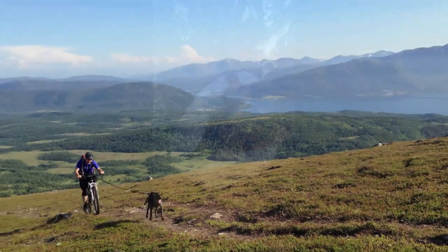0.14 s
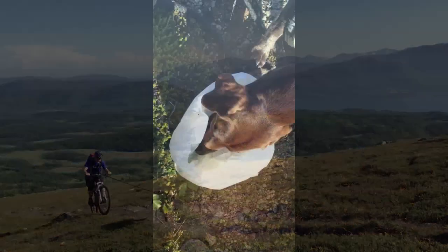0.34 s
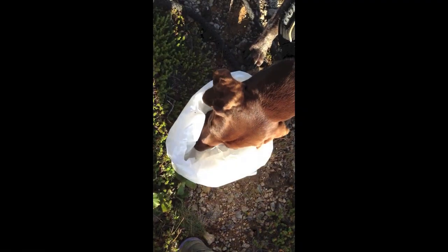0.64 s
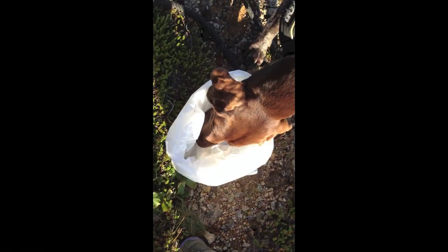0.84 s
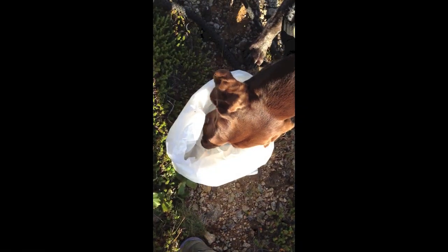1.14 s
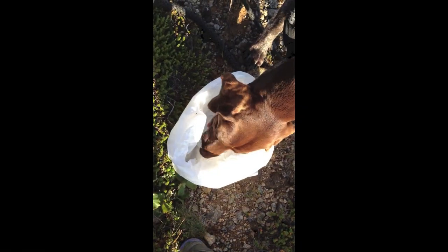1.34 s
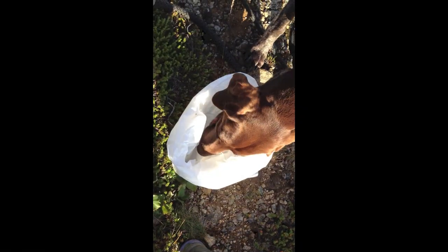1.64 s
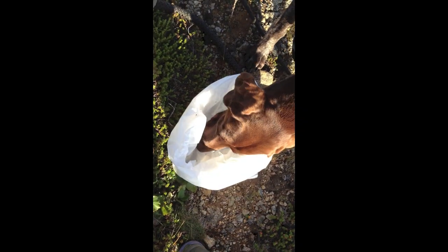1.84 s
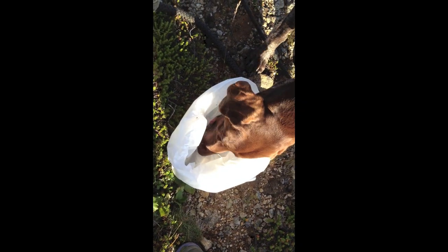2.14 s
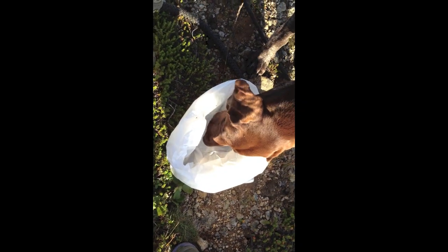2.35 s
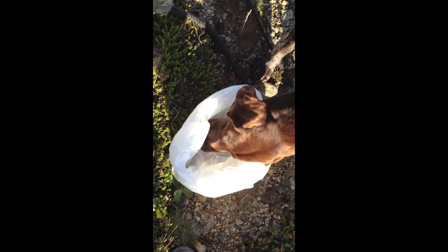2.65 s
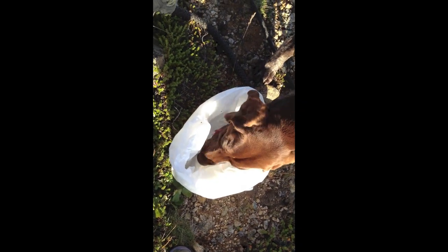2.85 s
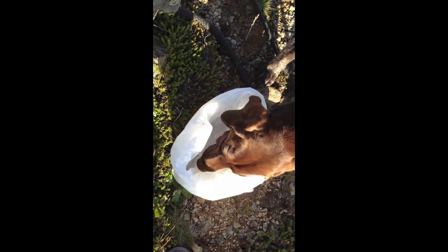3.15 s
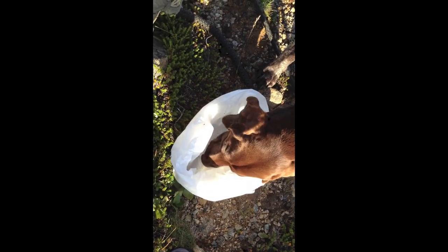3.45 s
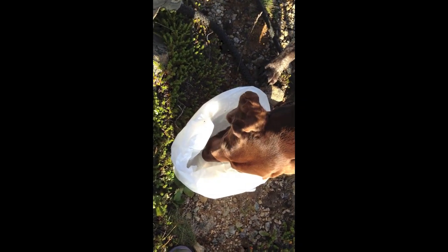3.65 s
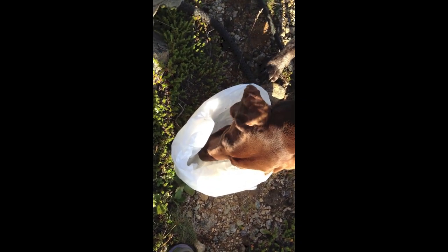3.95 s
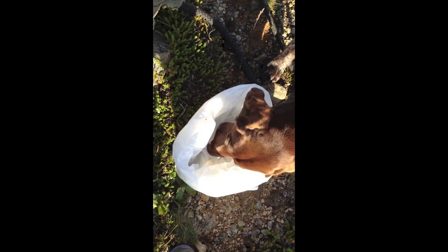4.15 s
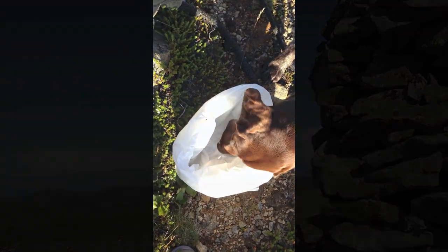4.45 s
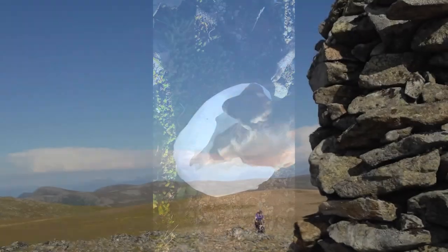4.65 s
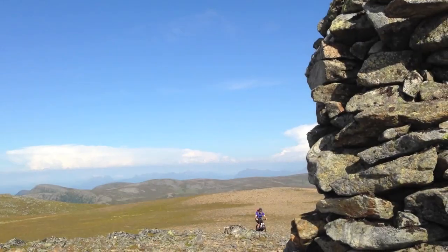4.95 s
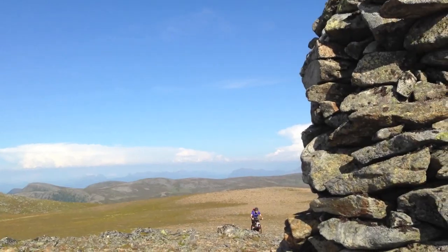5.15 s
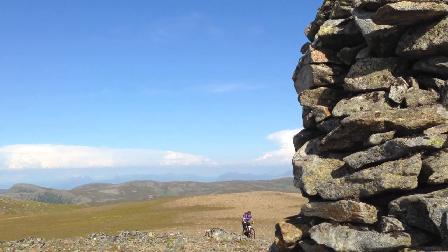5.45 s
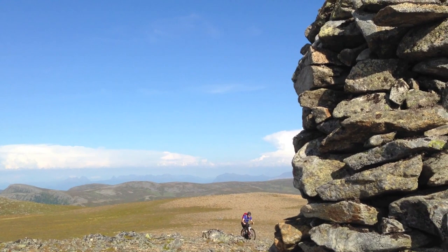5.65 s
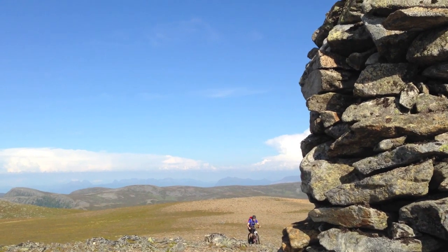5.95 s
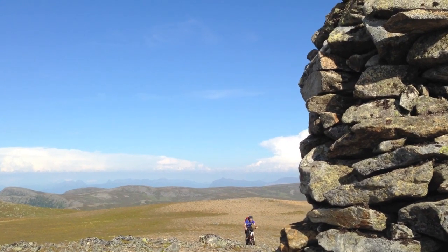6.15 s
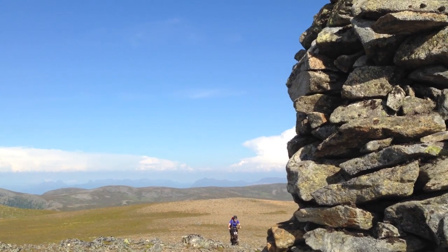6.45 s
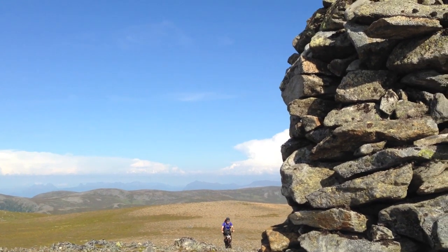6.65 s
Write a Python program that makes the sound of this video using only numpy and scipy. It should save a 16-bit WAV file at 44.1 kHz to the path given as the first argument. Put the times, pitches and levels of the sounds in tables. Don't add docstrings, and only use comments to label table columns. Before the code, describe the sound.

A dog laps water from a soft bag close up, quick wet slaps and hollow gulps about three a second, then faint hiss and a few taps.

```python
import sys
import numpy as np
from scipy import signal
from scipy.fft import rfft, irfft
from scipy.io import wavfile

SR = 44100
rng = np.random.default_rng(int(sys.argv[2]) if len(sys.argv) > 2 else 0)


def ratio(d):
    e = np.asarray(d, float) / 20
    return 10 ** e


def generate_wav(signal):
    frames = np.transpose(np.atleast_2d(signal))
    scaled = np.clip(frames, -1, 1) * 32767
    pcm = np.round(scaled).astype(np.int16)
    wavfile.write(sys.argv[1], SR, pcm)


N = 300497

# t/s, level/dB
BREEZE = [(0, -62.5), (.1, -62.5), (.22, -65), (.35, -101)]
# f/Hz, density/dB per Hz
BREEZE_COLOUR = [(100, -8), (250, -3), (600, -3), (1900, 4.5), (3500, -7), (8000, -12.5)]
# f/Hz, density/dB per Hz
HISS_COLOUR = [(30, -5), (60, -20), (110, -12), (200, -3.5), (350, -7.5), (600, -9), (1100, -14),
               (1800, -14), (3500, -10.5), (8000, -12.5), (15500, -13.5)]
# t/s, level/dB
HISS_LEVEL = [(0, -75), (.7, -66), (4.4, -69), (4.9, -67.5), (6.81, -67)]
# t/s, level/dB
LOW_AIR = [(4.5, -84), (4.66, -70), (4.82, -63), (4.9, -89), (5.28, -81), (5.5, -80), (6.81, -93.5)]
# middle t/s, level/dB, f/Hz, length/ms
WHISTLES = [(0.086, -60, 1730, 41), (.17, -67, 2130, 90), (5.1, -71, 199, 73), (5.28, -68.5, 165, 62),
            (5.3, -68, 420, 20), (5.428, -71, 202, 45), (5.52, -69.5, 260, 16), (5.975, -68.5, 228, 35),
            (6.34, -72, 257, 20), (6.4, -73.5, 190, 35), (6.745, -73.5, 300, 20), (6.712, -69, 1240, 30)]
# plunge t/s, length/s, plunge level/dB, scoop level/dB, thrown water level/dB
LAPS = [(0.284, 0.021, -74, -60.5, -58), (0.475, 0.095, -49, -49, -58.5), (0.812, 0.11, -43.5, -50, -57),
        (1.094, 0.082, -35.5, -44, -56.5), (1.379, 0.14, -42.5, -51, -59.5), (1.723, 0.13, -47.5, -68, -59),
        (1.988, 0.094, -49, -42.5, -56), (2.287, 0.096, -46, -45.5, -60.5),
        (2.646, 0.11, -48, -49.5, -56.5), (2.912, 0.093, -43, -52, -58.5), (3.203, 0.11, -38, -45.5, -59),
        (3.488, 0.11, -41, -58, -57.5), (3.846, 0.13, -49, -48, -60.5), (4.126, 0.092, -40.5, -43, -66),
        (4.428, 0.11, -43, -56.5, -56), (4.793, .08, -46, -65, -70)]
# t/s, level/dB
SLOSH = [(.3, -71), (.7, -58.5), (1, -61), (1.3, -69), (1.6, -59), (1.9, -61.5), (2.17, -62), (2.5, -66),
         (2.8, -67), (3.1, -70.5), (3.4, -77), (3.75, -61.5), (4.03, -76), (4.33, -69), (4.7, -80.5)]
# plunge, scoop, thrown water, nearing muzzle, slosh, each level/dB
GURGLE_FROM = (-3.5, -1.5, -6.2, 7.2, -7)
FROTH_FROM = (-9.5, -44.5, -33.5, -16, -5)
FIZZ_FROM = (-16, -11.5, 0, 2, -9.5)
SPRAY_FROM = (-51.5, -21.5, -8, -14.5, -16)
SPATTER_FROM = (-23.5, -18, -13, -14.5, -12.5)
HEAVE_FROM = (-19, -23.5, -24, -15, -29)
# t/s, peak level/dB, f/Hz
GULPS = [(.4799, -41, 533), (.5632, -40, 660), (.7982, -31.5, 444), (.8087, -19, 460), (.88, -38.5, 280),
         (1.079, -21, 386), (1.0925, -36, 513), (1.2686, -44, 420), (1.3774, -22, 406),
         (1.4462, -33.5, 423), (1.7291, -18.5, 425), (1.8164, -29.5, 396), (2.0279, -37, 516),
         (2.2803, -38.5, 553), (2.6535, -23, 486), (2.7178, -35, 443), (2.7328, -33, 448),
         (2.9448, -39.5, 537), (3.1967, -23.5, 510), (3.2047, -25, 437), (3.4811, -37.5, 615),
         (3.503, -32.5, 580), (3.5794, -37, 510), (3.8408, -37.5, 525), (3.9301, -33, 565),
         (4.1356, -21, 562), (4.2034, -34.5, 640), (4.4234, -24, 564), (4.4319, -22.5, 480),
         (4.7856, -40.5, 510), (1.1625, -33, 540), (1.461, -32, 575)]
# t/s, peak level/dB, f/Hz
CLOPS = [(.2973, -40, 440), (.89, -38, 252), (1.7999, -22.5, 282), (2.0523, -34, 600), (2.3576, -32.5, 294),
         (2.3871, -31.5, 395), (2.9867, -43, 310), (3.0077, -39, 465), (3.2686, -22, 375),
         (3.3294, -33.5, 543), (3.4886, -35, 385), (3.6078, -26, 696), (3.8577, -31.5, 350),
         (3.9161, -32, 460), (4.1251, -28, 560), (4.5432, -35.5, 313)]
# t/s, peak level/dB, f/Hz
PLOPS = [(.2878, -43, 806), (.458, -48, 705), (.4719, -45, 870), (.5438, -37, 710), (.5887, -42, 715),
         (.8087, -29.5, 1070), (.9204, -23.5, 853), (1.0162, -30.5, 970), (1.1928, -33.5, 970),
         (1.4871, -39.5, 870), (1.7984, -26, 756), (1.8463, -27, 902), (2.0848, -40.5, 900),
         (2.1222, -31.5, 777), (2.3591, -36, 900), (2.4125, -41, 750), (2.9089, -32.5, 757),
         (2.9822, -39.5, 950), (3.0371, -27.5, 780), (3.2885, -32.5, 703), (3.309, -27.5, 964),
         (3.5574, -38.5, 775), (3.6722, -43, 1130), (3.9645, -27, 835), (4.245, -27, 863),
         (4.5078, -32.5, 710), (4.6085, -51, 1100), (4.9029, -36.5, 910)]
# t/s, peak level/dB, f/Hz, t60/ms
SMACKS = [(0.5248, -45.5, 2370, 13), (0.7987, -38, 2130, 16), (0.8087, -29, 2780, 12),
          (1.08, -26, 1555, 17), (1.1928, -41.5, 2150, 25), (1.3759, -27, 2170, 11),
          (1.4103, -46, 1590, 17), (1.7286, -30, 1620, 7.2), (2.0054, -44.5, 1570, 3.3),
          (2.0593, -44, 2000, 9), (2.2195, -41, 1950, 5.9), (2.2324, -48, 2150, 42),
          (2.842, -30.5, 2055, 12), (3.1967, -32.5, 2260, 3), (3.2037, -37, 1940, 49),
          (3.288, -40, 2640, 6.4), (3.4142, -45, 2050, 13), (4.1211, -39, 2010, 11),
          (4.1301, -32, 2100, 2.6), (4.2454, -43.5, 2450, 23), (4.4249, -32.5, 2000, 36),
          (4.7317, -49.5, 1790, 18)]
# t/s, peak level/dB, f/Hz
DROPLETS = [(.525, -46, 4300), (0.8752, -35, 3900), (0.9205, -42, 3680), (1.0757, -35, 4680),
            (1.091, -35, 3900), (1.1902, -38.5, 4750), (1.2841, -44, 4700), (1.3749, -34, 4160),
            (1.4492, -35.5, 3950), (1.4861, -40, 3820), (1.727, -36.5, 4900), (1.7856, -36, 4160),
            (2.0726, -36.5, 3920), (2.23, -45, 5260), (2.3836, -40, 3860), (2.7318, -34, 4270),
            (2.841, -42, 5270), (2.9099, -36, 3500), (2.9832, -33, 4100), (3.177, -40, 4800),
            (3.2028, -33.5, 3530), (3.225, -40, 3580), (3.308, -38, 3160), (3.4177, -43.5, 5100),
            (3.581, -36.5, 4940), (3.6224, -33.5, 4650), (3.968, -42.5, 3820), (4.2005, -37, 3830),
            (4.4246, -36, 5080), (4.5212, -39.5, 4540), (4.842, -49, 4000), (4.878, -50, 3820)]
# t/s, peak level/dB, f/Hz, t60/ms
STRAYS = [(.8077, -35.5, 3480, 17), (.9199, -45.5, 2270, 26), (1.0686, -37, 490, 4.5),
          (1.1763, -53, 4570, 14), (1.3769, -29.5, 1635, 22), (2.548, -47.5, 3200, 6.5),
          (2.615, -48.5, 580, 60), (2.7358, -37, 3640, 22), (2.9822, -28, 4600, 2.8),
          (3.5759, -46, 2520, 25), (3.685, -48, 132, 33), (.816, -34, 507, 90), (4.428, -33, 1020, 31),
          (3.6796, -47.5, 303, 19), (3.9755, -50, 4680, 23), (4.396, -45.5, 595, 85), (4.765, -52, 575, 78),
          (1.131, -42, 470, 32)]
# t/s, peak level/dB, sheen of the top level/dB
SLAPS = [(0.296, -43, -21), (0.4175, -46.5, -19), (0.5434, -45, -10), (0.8059, -27, -16), (0.837, -44, -17),
         (0.888, -46, -23), (1.077, -28, -18.5), (1.1898, -35.5, -11), (1.2187, -40.5, -8),
         (1.312, -44, -21), (1.374, -42, -13), (1.4086, -38.5, -19), (1.729, -35, -24.5),
         (1.7994, -39, -20), (4.7312, -50, -25), (2.3296, -46, -8), (2.5707, -43, -26),
         (2.6466, -39.5, -12), (2.7337, -54, -9), (3.4655, -40, -26), (3.2015, -34, -24),
         (3.3074, -34, -27), (3.579, -40, -20), (3.608, -40, -17), (3.9186, -33, -27), (4.1655, -41, -7),
         (4.199, -44, -8), (4.2518, -37, -24), (4.4224, -32, -10), (4.8033, -39, -24)]
# f/Hz, width/Hz, level/dB
MOUTH = [(1462, 43, -0.5), (2000, 370, 6.5), (2560, 280, -3.5), (3580, 260, 2), (4000, 152, 2),
         (4670, 530, 2)]
# t/s, peak level/dB, f/Hz
GLUGS = [(0.4971, -48.5, 520.0), (3.68, -46, 1200), (0.8769, -36, 595), (0.902, -44, 560),
         (0.9622, -50, 457), (0.7945, -38, 620), (1.124, -39, 560.0), (1.2215, -45.5, 423),
         (1.3286, -49.5, 595), (1.4465, -36.5, 810), (1.516, -47, 426), (1.5524, -47.5, 1000),
         (2.71, -44, 1055), (1.832, -37, 780.0), (1.9953, -43.5, 780.0), (2.0519, -38.5, 573),
         (2.149, -45, 430), (2.1402, -41, 620), (2.187, -53, 1130), (2.305, -46, 620), (2.647, -35, 600),
         (2.4995, -48.5, 388), (2.7316, -36, 784), (2.784, -52, 388), (3.567, -42, 730),
         (2.9976, -43, 820.0), (3.0554, -48.5, 350), (3.2035, -33.5, 1130), (3.2169, -34.5, 505),
         (3.3534, -49, 390.0), (3.51, -38, 600), (1.156, -32, 560), (3.6109, -39.0, 334),
         (3.7797, -51.5, 477), (3.318, -33, 620), (4.0396, -51, 426), (4.119, -32, 560), (4.2026, -39, 334),
         (4.25, -41.5, 390.0), (4.412, -42, 560), (4.5173, -47, 334), (4.5224, -44, 780.0),
         (3.275, -38, 720), (4.82, -54, 540), (4.8048, -45, 430.0), (4.8778, -53, 780.0), (0.552, -42, 760)]
PLIPS = [(0.4568, -47.5, 2110.0), (0.4675, -49, 2070.0), (0.838, -46, 1530), (1.0772, -30, 2050),
         (1.0163, -40.0, 1990), (1.103, -39, 1830), (1.284, -48.5, 1900), (1.329, -51, 1650),
         (1.4446, -46.5, 2780), (1.4555, -47, 2700), (1.745, -45, 1800), (1.6434, -52, 2450.0),
         (1.515, -47, 2130), (1.8441, -43, 2140), (2.0144, -46, 1720.0), (3.212, -42, 1480),
         (0.81, -30, 1445), (2.2864, -46, 2150.0), (2.3294, -44.5, 1620), (2.4121, -44, 2670.0),
         (2.7312, -43, 2230), (2.7405, -43, 2190), (4.139, -42, 1950), (2.834, -46, 2050),
         (3.964, -47, 2240), (3.12, -53, 1940.0), (3.2515, -45, 1420.0), (3.207, -39, 2450),
         (3.496, -42, 2045), (3.5588, -47, 2450.0), (3.655, -54, 1920), (4.1745, -42, 1500),
         (4.35, -54, 1850.0), (4.3701, -50, 2480), (4.4436, -46.0, 2630.0), (4.5497, -47, 1760),
         (4.676, -58, 1900), (4.83, -58, 1950)]
FLECKS = [(0.808, -42, 14250), (0.351, -49.5, 4840), (0.5525, -45, 4750), (0.841, -42, 3920.0),
          (1.0915, -41, 4780.0), (1.0765, -38, 7500), (1.2035, -47, 4600), (1.448, -41.5, 5000.0),
          (1.6656, -51, 7700), (1.666, -51, 3420), (1.7107, -41, 3780), (1.8451, -46, 3450),
          (2.087, -39, 3920.0), (2.0902, -43, 6460.0), (2.2186, -49, 5400), (2.2508, -49, 3570.0),
          (2.3532, -44, 5380.0), (2.4003, -45, 4000), (2.6718, -47, 5530), (2.6914, -46, 3600),
          (2.7118, -44.5, 4220.0), (2.923, -45, 4220), (2.9092, -43, 5000), (2.995, -44, 4350),
          (3.0563, -54.5, 3060.0), (3.2025, -37, 4950.0), (3.2028, -33, 7470), (3.2155, -42.5, 4870),
          (2.1055, -45, 3770), (3.2673, -44, 3840), (3.3076, -40.5, 5430.0), (3.4995, -44, 3640),
          (2.387, -44, 4330), (3.499, -46, 5600.0), (3.5012, -41, 3960), (3.5605, -42, 4050.0),
          (3.6285, -40, 4800), (3.5642, -43.5, 9090.0), (3.6222, -39, 7200), (1.727, -44, 7235),
          (3.9195, -43, 4870), (3.9265, -41, 3880.0), (4.1202, -43, 3330), (4.5185, -46, 3810),
          (4.2019, -42.5, 7360.0), (4.2144, -43, 7560), (4.251, -45, 8550), (4.3407, -46, 4450),
          (4.3692, -46, 3620.0), (4.4255, -40, 9690), (4.4707, -42, 7600), (4.442, -48, 8600),
          (4.55, -51.5, 3200), (4.5517, -48.5, 3960.0), (4.879, -54, 4500), (4.856, -57, 3900),
          (1.1165, -43, 3800)]
# t/s, peak level/dB, thud f/Hz, tick level/dB
TAPS = [
    (5.179, -56, 403, -57),
    (5.3296, -41.5, 896, -31),
    (5.33, -46, 244, -85),
    (5.968, -54.5, 299, -55),
    (6.384, -72, 250, -52),
    (6.706, -60, 1300, -48),
]


def rms_one(x):
    return x / np.sqrt(np.mean(x ** 2) + 1e-20)


def in_time(rows, silent_db=-120):
    s, db = np.transpose(rows)
    return np.interp(np.arange(N) / SR, s, db, silent_db, silent_db)


def band(x, low_hz, high_hz, order=2):
    edges = [low_hz, min(high_hz, .45 * SR)]
    return signal.sosfilt(signal.butter(order, edges, "band", fs=SR, output="sos"), x)


def high_pass(x, hz):
    return signal.sosfilt(signal.butter(2, hz, "high", fs=SR, output="sos"), x)


def band_noise(low_hz, high_hz, order=2):
    return rms_one(band(rng.standard_normal(N), low_hz, high_hz, order))


def coloured(spectrum):
    table_hz, table_db = np.transpose(spectrum)
    hz = np.maximum(np.fft.rfftfreq(N + 1, 1 / SR), 1)
    gain = ratio(np.interp(np.log(hz), np.log(table_hz), table_db))
    return rms_one(irfft(rfft(rng.standard_normal(N + 1)) * gain, N + 1)[:N])


def drift(rate_hz):
    r = np.exp(-2 * np.pi * rate_hz / SR)
    return rms_one(signal.lfilter([1], [1, -2 * r, r * r], rng.standard_normal(N + SR))[SR:])


def resonance(x, hz, width_hz):
    r = np.exp(-np.pi * width_hz / SR)
    poles = [1, -2 * r * np.cos(2 * np.pi * hz / SR), r * r]
    return signal.lfilter([(1 - r * r) / 2, 0, (r * r - 1) / 2], poles, x)


def grains(per_s, spread_db):
    sizes = ratio(spread_db * np.minimum(rng.exponential(1, N), 3)) * rng.choice([-1, 1], N)
    return sizes * (rng.random(N) < per_s / SR) + 1e-18


def puffs(times, levels_db, t60_ms):
    clicks = np.zeros(N)
    clicks[(np.array(times) * SR).astype(int)] = ratio(np.array(levels_db))
    return signal.lfilter([1], [1, -ratio(-60e3 / (t60_ms * SR))], clicks)


def bubbles(table, gain_db, attack_cycles, rise, lead_ms):
    length = 4096
    out, envelope, t = np.zeros(N + length), np.zeros(N + length), np.arange(length) / SR
    for s, level_db, hz, t60_ms in table:
        swell = np.sin(np.pi / 2 * np.minimum(t * hz / attack_cycles, 1)) ** 2
        shape = swell * ratio(-60e3 * t / t60_ms)
        shape *= ratio(level_db + gain_db) / shape.max()
        glide_hz = hz * (1 - rise / 2 + rise * np.minimum(5200.0 * t / t60_ms, 2))
        at = int((s - lead_ms / 1000) * SR - attack_cycles / hz * SR)
        out[at:at + length] += shape * np.sin(2 * np.pi * (np.cumsum(glide_hz) / SR + rng.random()))
        envelope[at:at + length] += shape
    return out[:N], envelope[:N]


def ringing(table, cycles):
    return [(s, db, hz, 1000 * cycles / hz) for s, db, hz in table]


def splash(envelope, before_ms, after_ms):
    late, early = np.exp(-1000 / (after_ms * SR)), np.exp(-1000 / (before_ms * SR))
    tail = signal.lfilter([1 - late], [1, -late], envelope)
    return signal.lfilter([1 - early], [1, -early], tail[::-1])[::-1]


def patchy(x, low_hz, high_hz, patchy_db, tilt_db):
    edges = np.geomspace(low_hz, high_hz, 7)
    total = np.zeros(N)
    for k, (low, high) in enumerate(zip(edges, edges[1:])):
        total += ratio(patchy_db * drift(99.44) + tilt_db * k) * band(x, low, high)
    return rms_one(total)


def sized_rings(per_s, pitches_hz, fall_db, cycles):
    clicks, dealt = grains(per_s, spread_db=2.5), rng.integers(0, len(pitches_hz), N)
    return sum(ratio(-fall_db * k) * resonance(clicks * (dealt == k), hz, hz / cycles)
               for k, hz in enumerate(pitches_hz))


def hillside():
    t = np.arange(N) / SR
    hiss = ratio(in_time(HISS_LEVEL, -68)) * coloured(HISS_COLOUR)
    air = ratio(in_time(LOW_AIR, -80) + 3.2 * drift(12)) * band_noise(85, 300)
    breeze = ratio(in_time(BREEZE) + 2 * drift(6.1)) * coloured(BREEZE_COLOUR)
    for s, db, hz, length_ms in WHISTLES:
        swell = np.exp(-((t - s) / (length_ms / 2000)) ** 2)
        breeze = breeze + ratio(db) * swell * np.sin(2 * np.pi * hz * t)
    return hiss + air + breeze


def humps(times, hold_s, levels_db, rise_db_s, fall_db_s):
    t = np.arange(0, N + 32, 32)[:, None] / SR
    climb_db = rise_db_s * np.maximum(times - t, 0)
    sink_db = fall_db_s * np.maximum(t - times - hold_s, 0)
    return np.interp(np.arange(N) / SR, t[:, 0], ratio(levels_db - climb_db - sink_db).sum(axis=1))


def strokes():
    s, length, plunge_db, scoop_db, thrown_db = np.transpose(LAPS)
    plunge_hold_s, scoop_hold_s, thrown_fall_db_s = 0.0029, 0.0059, 402
    scoop_s = s + 0.83 * length
    plunge = humps(s - plunge_hold_s / 2, plunge_hold_s, plunge_db, rise_db_s=499, fall_db_s=456.5)
    scoop = humps(scoop_s - scoop_hold_s / 2, scoop_hold_s, scoop_db, rise_db_s=300, fall_db_s=256.5)
    thrown = humps(s, length, thrown_db, rise_db_s=405, fall_db_s=thrown_fall_db_s)
    nearing = humps(s, length, thrown_db - 13, rise_db_s=57, fall_db_s=thrown_fall_db_s / 2)
    return np.array([plunge, scoop, thrown, nearing, ratio(in_time(SLOSH))])


def pockets():
    gulps, gulp_stir = bubbles(ringing(GULPS, 10.3), gain_db=1.5, attack_cycles=1.3, rise=0.08, lead_ms=0.57)
    clops, clop_stir = bubbles(ringing(CLOPS, 3), gain_db=1.5, attack_cycles=1.123, rise=0.055, lead_ms=0.52)
    plops, plop_stir = bubbles(ringing(PLOPS, 18.5), gain_db=2.5, attack_cycles=1.7, rise=0.08, lead_ms=0.2)
    return gulps + clops + plops, gulp_stir + clop_stir + ratio(-8) * plop_stir


def gurgle():
    rings = sized_rings(1400, np.geomspace(280, 1050, 10), fall_db=0.8, cycles=9.1)
    return rms_one(band(rings + 0.19 * resonance(rings, 450, 91), 190, 2200))


def burst(modes, cycles):
    out = np.zeros(N)
    for hz, width_hz, db in modes:
        for size in (-1, 0, 1):
            pitch_hz = hz + size * width_hz / 2
            swelling = resonance(grains(per_s=130, spread_db=2.5), pitch_hz, pitch_hz / 3)
            out += ratio(db) * resonance(swelling, pitch_hz, pitch_hz / cycles)
    wash = band_noise(modes[0][0] * 0.46, modes[-1][0] * 1.59)
    return rms_one(rms_one(out) + 0.55 * wash)


def spatter():
    return rms_one(sized_rings(900, np.geomspace(1600, 9000, 10), fall_db=1.5, cycles=6.5))


def slaps():
    slap_s, slap_db, sheen_db = np.transpose(SLAPS)
    snaps = splash(puffs(slap_s, slap_db, t60_ms=11.0), before_ms=0.3, after_ms=0.4)
    sheens = splash(puffs(slap_s, slap_db + sheen_db, t60_ms=10.0), before_ms=.15, after_ms=.6)
    snap_noise = patchy(rng.standard_normal(N), 1590, 8160, patchy_db=2.0, tilt_db=-0.4)
    return ratio(-1.5) * snap_noise * snaps + ratio(1) * sheens * band_noise(9500, 16080)


def bag_heave(swaying, low_stir):
    sway = band_noise(145, 260) * swaying * ratio(3.5 * drift(15))
    jolts = ratio(-30.0) * splash(low_stir, before_ms=4.0, after_ms=9.0) * band_noise(140, 260)
    return sway + jolts


def lapping():
    trapped, low_stir = pockets()
    smacks, mid_stir = bubbles(SMACKS, gain_db=2.0, attack_cycles=4.55, rise=0.011, lead_ms=0.11)
    droplets, high_stir = bubbles(ringing(DROPLETS, 78), gain_db=0.0, attack_cycles=8.0, rise=0.046, lead_ms=0.1)
    strays, _ = bubbles(STRAYS, gain_db=4.0, attack_cycles=1.45, rise=0.11, lead_ms=0.64)
    answers_db = np.array([GURGLE_FROM, FROTH_FROM, FIZZ_FROM, SPRAY_FROM, SPATTER_FROM, HEAVE_FROM])
    churning, frothing, fizzing, spraying, dripping, swaying = ratio(answers_db) @ strokes()
    low_wet = splash(low_stir, before_ms=3.9, after_ms=3.4)
    mid_wet = splash(mid_stir, before_ms=2.1, after_ms=3.5)
    high_wet = splash(high_stir, before_ms=1.2, after_ms=4.8)
    flicker_db = 2.6 * drift(43)
    low = gurgle() * (churning * ratio(flicker_db - 6.5) + ratio(-10.5) * low_wet)
    froth_gain = frothing * ratio(flicker_db + 0.2) + ratio(-4.5) * mid_wet + ratio(-29.5) * low_wet
    froth = burst(MOUTH[:3], cycles=21.0) * froth_gain
    fizz = burst(MOUTH[3:], cycles=15.0) * (fizzing * ratio(flicker_db - 4.0) + ratio(-6.0) * high_wet)
    mist = patchy(grains(6000, spread_db=-4.0), 6300, 17100, patchy_db=4.8, tilt_db=-0.85)
    spray = mist * spraying * ratio(flicker_db) + spatter() * dripping
    water = trapped + smacks + droplets + strays + low + froth + fizz + spray + slaps()
    return bag_heave(swaying, low_stir) + high_pass(water, 210)


def lesser_bubbles():
    glugs, _ = bubbles(ringing(GLUGS, 17.0), gain_db=0.2, attack_cycles=2.166, rise=0.13, lead_ms=0.33)
    plips, _ = bubbles(ringing(PLIPS, 34.0), gain_db=0.3, attack_cycles=5.2, rise=0.046, lead_ms=0.47)
    flecks, _ = bubbles(ringing(FLECKS, 65.0), gain_db=1.4, attack_cycles=7.0, rise=0.022, lead_ms=0.3)
    s, db, _ = np.transpose([*PLIPS, *FLECKS, *DROPLETS])
    ticks = puffs(s - .0015, db - 13.0, t60_ms=7.6) * band_noise(1500, 9000, order=1)
    return glugs + plips + flecks + ticks


def taps():
    times, _, _, ticks_db = np.transpose(TAPS)
    rings = [(s, db, hz, 20.5) for s, db, hz, _ in TAPS]
    thuds, swell = bubbles(rings, gain_db=-1.0, attack_cycles=0.5, rise=-0.11, lead_ms=-2.11)
    clicks = puffs(times, ticks_db, t60_ms=0.42)
    ticks = band(clicks, 500, 13000, order=1) + 1.45 * resonance(clicks, 2420, 970)
    tail = splash(swell, before_ms=.3, after_ms=0.46) * band_noise(150, 1300, order=1)
    return thuds + ticks + 0.32 * tail


def scene():
    return (hillside() + lapping() + lesser_bubbles() + taps())[None, :]


def top_cut(x):
    return signal.sosfilt(signal.butter(12, 16090, fs=SR, output="sos"), x)


def record(dry):
    cut = high_pass(dry, 90)
    cut = signal.sosfilt(signal.cheby2(12, 60, 16250, fs=SR, output="sos"), cut)
    return top_cut(cut)


dry = scene()
out = record(dry)
generate_wav(out)
```